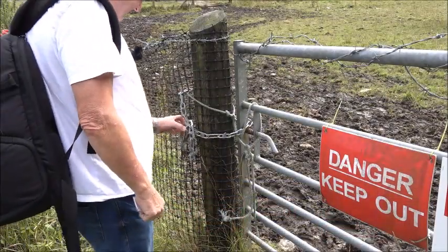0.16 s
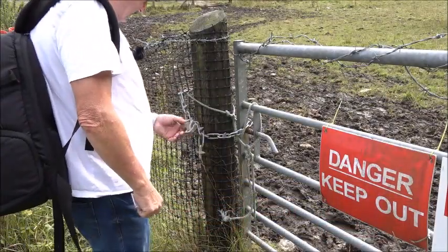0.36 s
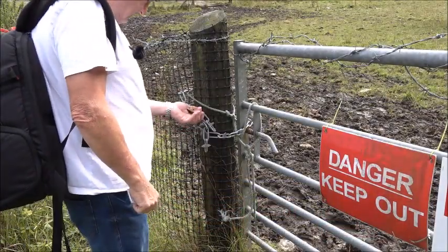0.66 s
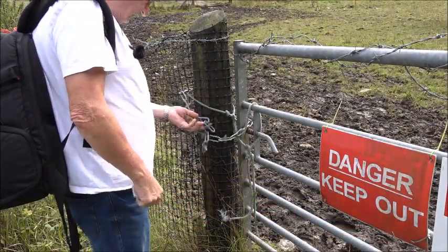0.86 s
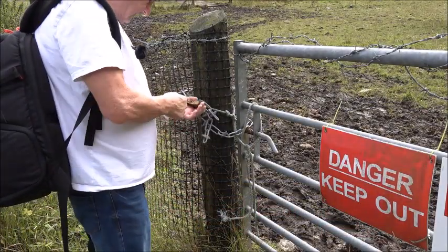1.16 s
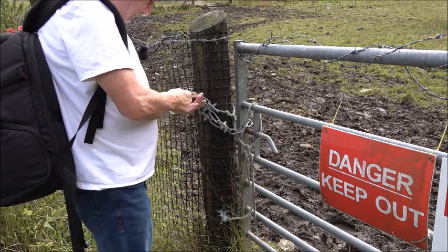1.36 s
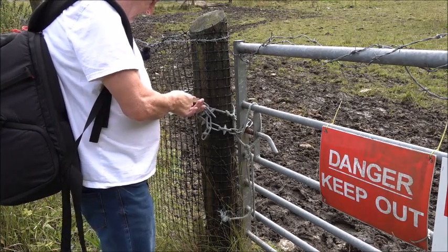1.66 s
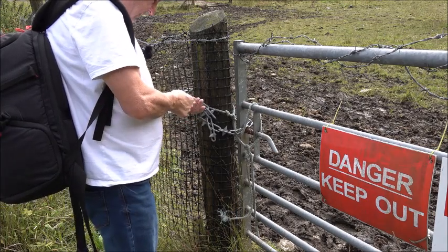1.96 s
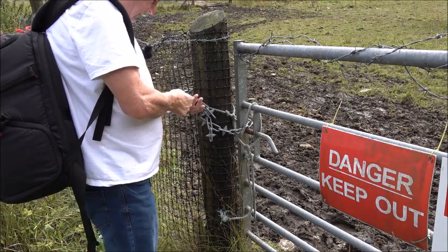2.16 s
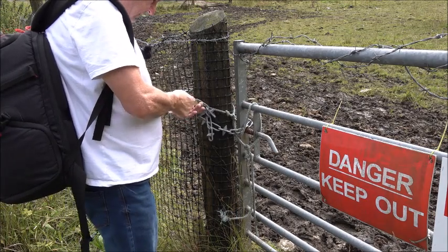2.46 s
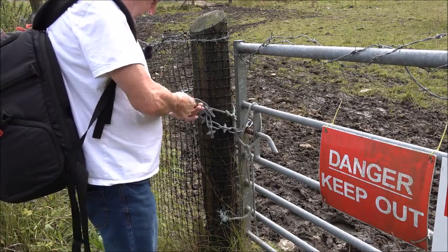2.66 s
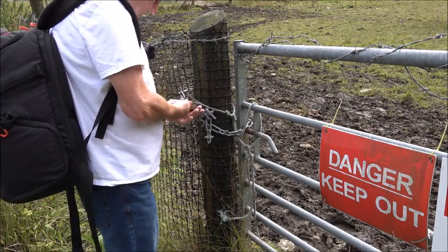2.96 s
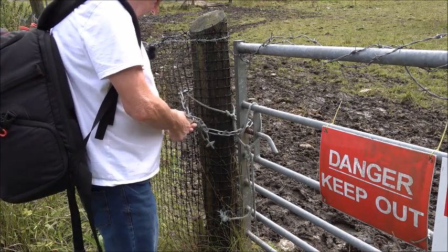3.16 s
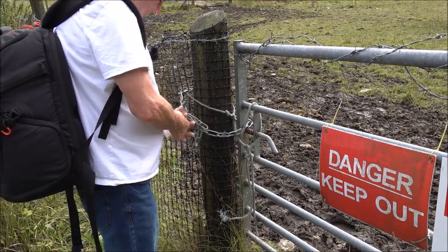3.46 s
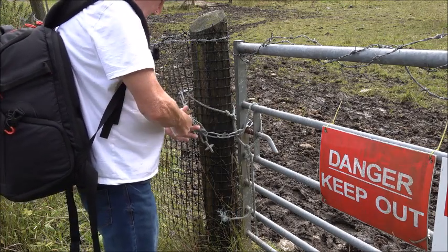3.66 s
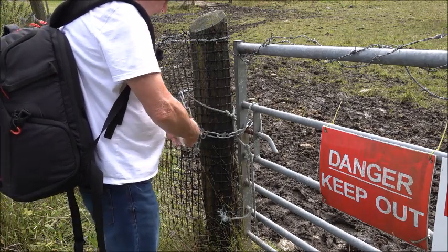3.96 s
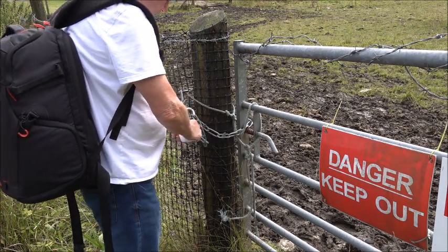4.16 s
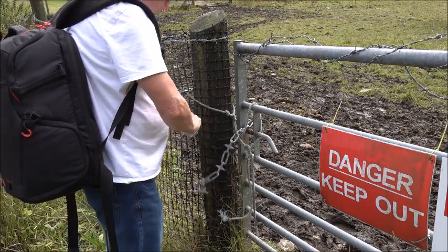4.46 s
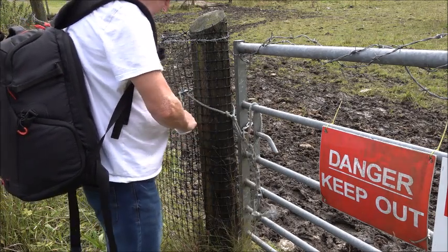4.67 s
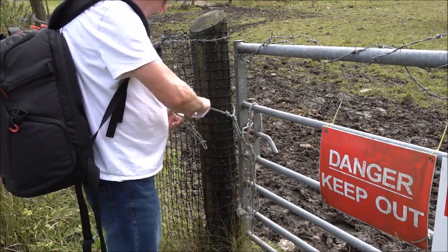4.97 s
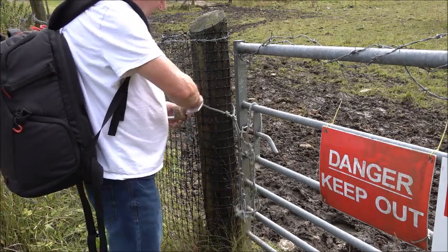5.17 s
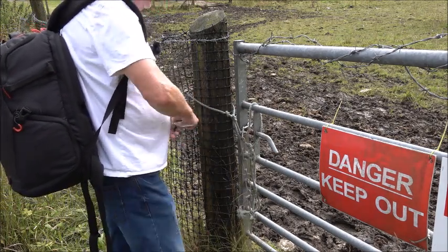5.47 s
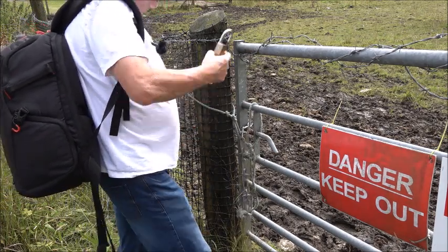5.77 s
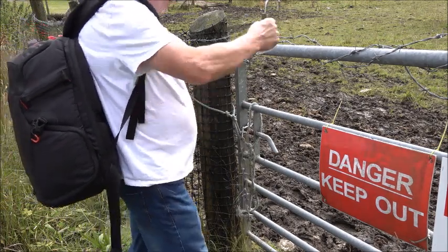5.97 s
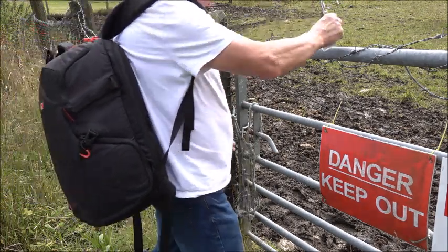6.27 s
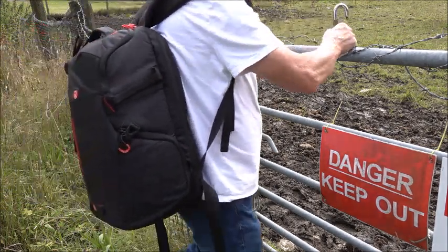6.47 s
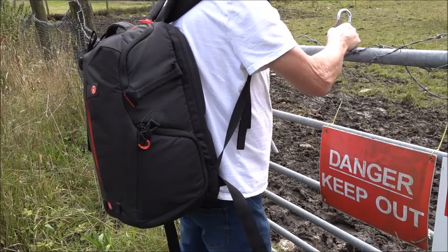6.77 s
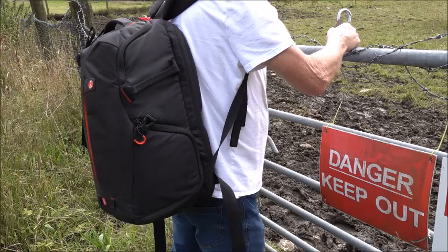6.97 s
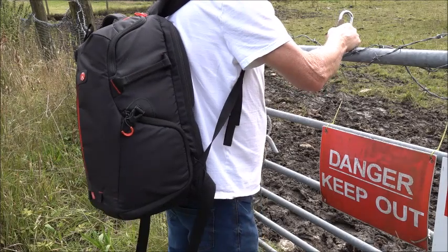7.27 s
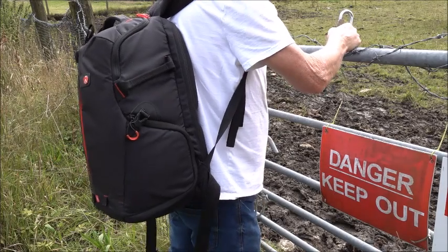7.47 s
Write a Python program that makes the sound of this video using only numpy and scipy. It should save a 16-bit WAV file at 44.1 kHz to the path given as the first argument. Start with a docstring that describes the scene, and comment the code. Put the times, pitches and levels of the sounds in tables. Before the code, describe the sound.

Outdoors, chain links jingle, a snap hook clicks, the freed chain strikes a hollow steel gate, and a shove makes it clatter.

```python
"""A steel chain is unhooked from a tubular field gate, outdoors. Its links clink as damped modes and slide as dense slips.
The snap hook clicks with short, hand-damped modes; the freed chain excites the long modes of the gate's tubes.
Shoving makes the gate rattle in short noise bursts; bumps on a wooden post thud and knock.
Clothes and scuffing are clumped noise, over steady open air and a faint low hum that swells twice."""
import sys
import numpy as np
from scipy import signal
from scipy.fft import rfft, irfft, next_fast_len
from scipy.io import wavfile

SR = 44100
rng = np.random.default_rng(int(sys.argv[2]) if len(sys.argv) > 2 else 0)


def digitize_waveform(pressure):
    """Quantize a signal to 16-bit integers and store it at the path in sys.argv[1].

    Rows of a 2-D input are taken as channels; values are limited to [-1, 1].
    """
    field = np.atleast_2d(pressure).T
    bounded = np.clip(field, -1, 1)
    quanta = np.round(bounded * 32767).astype(np.int16)
    wavfile.write(sys.argv[1], SR, quanta)


N = 336042
AGE = np.arange(int(.9 * SR)) / SR   # time since a contact, s

# All levels are relative: each source adds its own gain.
# strikes of link on link: [t/s, link size, ring level/dB, clash level/dB]
LINK_STRIKES = [(0.122, "long", -52.5, -50.5), (0.548, "long", -36, -36.5), (.5622, "long", -30, -32.5),
                (0.574, "long", -24, -26.5), (.632, "long", -45, -39.5), (0.6608, "short", -40.5, -34.5),
                (.7672, "short", -45.5, -44.5), (.8305, "long", -38, -48), (0.8687, "long", -36, -45),
                (.889, "long", -44, -28), (0.9342, "long", -31, -27), (0.9664, "long", -29.5, -26.5),
                (1.0472, "short", -47, -59), (1.128, "short", -44, -50), (1.213, "short", -50, -38.5),
                (1.2342, "short", -48, -39.5), (1.3107, "short", -57, -45.5), (1.3783, "short", -56, -39),
                (1.544, "long", -46.5, -51), (1.6415, "short", -38, -40), (2.9346, "long", -37, -27.5),
                (4.1594, "long", -39, -49), (4.1681, "long", -38.5, -35.5), (4.2411, "long", -49.5, -16),
                (4.2976, "long", -33.5, -27.5), (4.3724, "long", -43.5, -52), (4.4144, "short", -54, -33.5),
                (4.4548, "long", -38, -36), (4.4651, "long", -23.5, -24), (4.5059, "long", -25.5, -18.5),
                (4.5495, "long", -17, -20.5), (4.568, "short", -32, -27), (5.508, "long", -44, -46),
                (5.564, "long", -34.5, -33.5), (5.5839, "long", -27, -26), (5.619, "long", -30, -33.5),
                (5.6649, "long", -56, -42), (5.725, "long", -50, -45)]
# runs of links tumbling over each other: [start t/s, end t/s, level/dB]
TUMBLE_RUNS = [(.39, .52, -57), (.9, .93, -31), (4.245, 4.28, -46), (4.47, 4.485, -42),
               (4.52, 4.545, -32.5), (5.59, 5.615, -39)]
# how taut the hand holds the chain: [t/s, tautness from 0 hanging free to 1 taut]
TAUTNESS = [(0, 0.75), (1.7, 1), (4.15, 0.14), (4.5, 0.038), (4.56, .9), (5.6, 0.51)]
# modes of the two link sizes: size: [pitch f/Hz, overtone f/Hz, overtone level/dB, overtone t60 over pitch t60]
LINK_MODES = {"long": (6621.5, 12758.5, -3, 1.07), "short": (7230, 12870, 3.5, 1.6)}
# modes of the neighbouring links, shaken by a clash: [f/Hz, level/dB]
NEIGHBOUR_MODES = [(5030, -10.5), (5320, -19), (6040, -1.5), (7150, -9.5), (7500, -2), (8330, -8.5),
                   (8650, 2), (8880, -12.5), (9350, 1), (10720, -2), (11100, -24), (11370, 6),
                   (11930, -8.5), (13560, -1.5), (14560, -21.5)]
# spectrum of the clash of links: [f/Hz, level/dB]
CLASH_SPECTRUM = [(4500, -13.5), (6000, -5.5), (7000, 0), (9000, 4), (10200, -6.5), (11200, -5),
                  (13000, -10), (15500, -14.5)]
# spectrum of the knock on the chain: [f/Hz, level/dB]
KNOCK_SPECTRUM = [(150, -7), (1200, -6), (2200, 3.5), (4500, -2), (7000, -2.5), (12000, -26)]
FREE_T60_S, TAUT_T60_S = 0.19, 0.059   # a taut chain rings shorter
HARD_HIT_DB, SHORTER_PER_DB = -31.5, 0.0449   # and harder hits die sooner; t60 log-slope per dB of clash
KNOCK_DB, SLACK_LOSS_DB = 6, 16   # the knock against the clash when taut; what a free chain loses of it
HELD_NEIGHBOURS_DB = 7.5   # a taut chain mutes the neighbouring links by this much
OVERTONE_FOLLOWS = 0.37   # the overtone's level lies this share of the way from ring to clash

# snaps of the hook: [t/s, body level/dB, hardness as edge over body/dB]
HOOK_CLICKS = [(.198, -60.5, 17.5), (0.441, -46, 5), (.6479, -46, 12), (.7217, -47, 2), (0.8968, -45, 16),
               (1.008, -47, 11.5), (1.58, -41.5, -13), (1.8978, -37, 6), (2.2093, -45.5, 0.5),
               (2.378, -44.5, -10), (2.4464, -37, -2), (2.631, -42.5, 20.5), (2.9254, -24, 1.5),
               (3.1887, -43, 15.5), (3.2977, -43, 10), (3.41, -37.5, 1), (3.5123, -34.5, -4),
               (3.525, -26.5, -2), (3.533, -31.5, 7), (3.5599, -24.5, 3.5), (3.5995, -40.5, 10.5),
               (3.6057, -28.5, 4.5), (3.7345, -31, 2.5), (3.809, -41, -13), (3.8902, -37.5, 2),
               (3.915, -36, -3), (3.9367, -27.5, -4), (3.965, -22.5, -2), (3.9762, -27.5, 3),
               (3.9978, -38, -4), (4.033, -38, 1.5), (5.167, -44, 14), (5.4635, -46, 4),
               (5.7736, -40.5, -2), (5.8328, -35.5, 5), (5.8526, -27, 11.5), (5.8897, -35.5, 4),
               (6.3706, -31.5, 9), (6.388, -32, 2.5), (6.4112, -38, 0), (6.425, -46.5, 11)]
# fumbling with the hook, runs of lighter contacts: [start t/s, end t/s, body level/dB]
FUMBLE_RUNS = [(.67, .7, -50.5), (2.81, 2.9, -45), (3.13, 3.19, -45.5), (3.35, 3.405, -45),
               (3.55, 3.575, -34.5), (3.94, 3.962, -31.5), (5.13, 5.165, -45.5), (5.855, 5.88, -39)]
# low modes of the hook: [f/Hz, level/dB, t60/s]
HOOK_BODY_MODES = [(1273, -8.5, 0.02), (1890, 2, 0.02), (2016, -8, 0.067), (2140, -17, 0.016),
                   (2966, -10.5, 0.02)]
# high modes of the hook: [f/Hz, level/dB, t60/s]
HOOK_EDGE_MODES = [(3880, -2, 0.033), (4850, -12.5, 0.016), (5550, 16, 0.012), (6220, 0, 0.03),
                   (7840, -3.5, 0.07), (9900, -7, 0.05), (14450, -30, 0.018)]
# spectrum of a small steel tick: [f/Hz, level/dB]
TICK_SPECTRUM = [(300, -48), (900, -12), (2000, -2), (4000, -1.5), (6500, -0.5), (9500, -7), (12000, -15.5),
                 (15500, -18.5)]
FUMBLE_HARDNESS_DB = 7   # edge over body

# steel sliding over steel: [start t/s, end t/s, level/dB]
SLIDE_RUNS = [(0.582, 0.593, -30), (0.885, 0.981, -33), (0.985, 1.065, -48), (2.494, 2.592, -51.5),
              (2.6, 2.627, -47), (2.897, 2.949, -39), (3.34, 3.41, -45), (3.929, 3.983, -35.5),
              (4.513, 4.589, -35.5), (5.827, 5.863, -26.5)]
# spectrum of the sliding: [f/Hz, level/dB]
SLIDE_SPECTRUM = [(200, -15), (700, -19), (1300, -1), (2000, 2.5), (3000, 0), (7000, 0.5), (9000, 0.5),
                  (11500, -9.5), (15500, -5.5)]
TICKS_DB, TICKS_FOLLOW = -3.5, 0.94   # loose ticks at a rub level of 0 dB; share of its swing in dB
LET_GO_S, LET_GO_DB = 5.9, -5   # once the chain is let go, its links tick less

# the chain hits the gate: [t/s, body level/dB, crash level/dB, whine level/dB, whine centre f/Hz]
GATE_STRIKES = [(4.6794, -17, -17.5, -23, 4520), (4.739, -24.5, -23.5, -23, 4490),
                (4.7858, -31, -24.5, -55, 4470), (4.8274, -27.5, -18, -21, 4443),
                (4.957, -21.5, -17.5, -23, 4231)]
# low modes of the gate: [f/Hz, level/dB, t60/s]
GATE_BODY_MODES = [(225, -22, 0.43), (286, -21, 0.87), (524, -15.5, 0.97), (588, -7.5, 0.3),
                   (617.5, -8, 0.45), (736, -5.5, 0.26), (944, -4, 0.4), (1000, -1, 0.35), (1058, -6, 0.25),
                   (1228, -7, 0.19), (1400, 3, 0.21), (1462, 2, 0.24), (1513, -7, 0.43), (1960, -2, 0.15),
                   (2010, 6, 0.18), (2480, -13.5, 0.225), (2725, 2.5, .2), (2880, -22, 0.22),
                   (3370, 2.5, 0.13)]
# high modes of the gate: [f/Hz, level/dB]
GATE_TOP_MODES = [(4931, -11.5), (5190, -6.5), (5440, 2), (5760, -2.5), (6089, -1), (6449, -6),
                  (6849, -6.5), (7273, -13), (7613, -7), (7766, -30), (9243, -2), (12180, -6.5),
                  (12390, -16)]
# close-set modes of the tube wall, which beat: [f/Hz, level/dB, t60/s]
WALL_MODES = [(4153, -2, .68), (4204, -1, .55), (4249, -2, .55), (4290, -5, .6), (4344, 3, .72),
              (4398, -3, .66), (4485, -10, .42), (4606, -10, .48), (4651, -12, .5)]
# spectrum of the blow's thud: [f/Hz, level/dB]
THUD_SPECTRUM = [(60, -18), (200, -12.5), (400, -7.5), (600, 3), (800, -3.5), (1450, 3.5), (2200, 1),
                 (2900, 3), (3600, -12.5), (5000, -17.5)]
# spectrum of the blow's crash: [f/Hz, level/dB]
CRASH_SPECTRUM = [(3000, -26), (4300, -4), (5500, -5.5), (8000, -5), (9700, -10), (11000, -14.5),
                  (12400, -9), (15500, -25.5)]
# the shoved gate jolts in its fittings: [t/s, body level/dB, crash level/dB]
GATE_JOLTS = [(7.269, -28, -31), (7.2949, -24, -26.5), (7.3516, -20.5, -23), (7.4568, -34.5, -32.5),
              (7.5083, -38.5, -25)]
# spectrum of a jolt's body: [f/Hz, level/dB]
JOLT_BODY_SPECTRUM = [(100, -25), (350, -26), (580, -0.5), (800, -28), (1250, 0), (1650, -11), (2000, -5),
                      (2700, 4.5), (3400, -2), (6000, -8.5)]
# spectrum of a jolt's crash: [f/Hz, level/dB]
JOLT_CRASH_SPECTRUM = [(3000, 0), (4500, -5), (7000, 2.5), (9000, 0), (12000, -1.5), (15500, -19)]
# early echoes from the ground and the body: [delay t/s, level/dB]
EARLY_ECHOES = [(.0019, -20), (.0046, -21)]

# hand and chain bump the wooden post: [t/s, thump level/dB, hard knock level/dB]
POST_BUMPS = [(0.579, -46.5, -35), (.635, -48.5, -36), (2.628, -51.5, -38), (2.9357, -44, -13.5),
              (4.415, -52, -32.5), (4.55, -47, -23)]
# spectrum of the post's thump: [f/Hz, level/dB]
POST_THUMP_SPECTRUM = [(40, -8), (70, -4.5), (200, -11.5), (400, -8), (900, -12.5)]
# spectrum of steel knocking on wood: [f/Hz, level/dB]
POST_KNOCK_SPECTRUM = [(150, -12.5), (500, -5.5), (1000, 1.5), (1500, 3), (2200, -1), (3000, 1), (4500, -9),
                       (7000, -3), (12000, -23)]

# rubs, scuffs and a few brief ticks: [centre t/s, half width t/s, level/dB]
RUBS_AND_TICKS = [(.325, 0.0096, -50), (.66, 0.21, -53.5), (.97, 0.08, -45.5), (1.38, 0.24, -55.5),
                  (2.75, 0.23, -59.5), (3.3, .13, -54), (3.8, 0.5, -61.5), (4.35, 0.25, -56.5),
                  (4.555, 0.065, -44), (5.62, 0.09, -52), (6.08, 0.2, -57), (6.625, .046, -39.5),
                  (6.712, .011, -44.5), (6.775, 0.03, -47.5), (7.272, 0.014, -32), (7.35, 0.052, -29.5),
                  (7.53, 0.13, -40.5)]
# spectrum of the scuffing: [f/Hz, level/dB]
SCUFF_SPECTRUM = [(120, -14), (300, -9), (520, 1.5), (800, -2), (1300, -0.5), (1900, 3), (2800, -7),
                  (4500, -8), (7000, -20.5)]
# spectrum of the clothes: [f/Hz, level/dB]
CLOTH_SPECTRUM = [(2000, -7), (4000, -5), (7000, 7.5), (10000, -12), (13000, -9), (15500, -12.5)]
CLOTH_DB = -13.5   # hiss of the clothes against the scuffing
# swells of the faint hum: [centre t/s, half width t/s, level/dB]
HUM_SWELLS = [(1.25, 0.22, -59.5), (6.27, 0.094, -56)]
# spectrum of the hum: [f/Hz, level/dB]
HUM_SPECTRUM = [(330, -17), (410, 5), (490, -16)]
# spectrum of the open air: [f/Hz, level/dB]
AIR_SPECTRUM = [(20, 3.5), (60, 0.5), (150, -5), (300, -8.5), (550, -7), (1200, -10), (1950, -9.5),
                (3000, -17.5), (5000, -20), (8000, -23), (15000, -31.5)]


def links():
    """Modal excitation: a link rings at two pitches; its clash shakes the neighbours and knocks on the chain."""
    out = np.zeros(N)
    for s, size, ring_db, clash_db in LINK_STRIKES + tumbling():
        hz, overtone_hz, overtone_db, overtone_ring = LINK_MODES[size]
        taut = np.clip(np.interp(s, *np.transpose(TAUTNESS)), 0, 1)
        t60 = FREE_T60_S + taut * (TAUT_T60_S - FREE_T60_S)
        t60 *= np.exp(-SHORTER_PER_DB * (clash_db - HARD_HIT_DB))

        # each pitch is a close pair of modes
        pitch = [(hz, 0, t60), (hz + 55, -6, t60 * 1.3)]
        overtone = [(overtone_hz, 0, overtone_ring * t60), (overtone_hz + 80, -7, t60 * 0.73)]
        neighbours = [(line, db, min(1.06 * t60, .25)) for line, db in NEIGHBOUR_MODES]
        overtone_level_db = ring_db + overtone_db + OVERTONE_FOLLOWS * (clash_db - ring_db)
        neighbours_db = clash_db - 0.5 - HELD_NEIGHBOURS_DB * taut
        knock_db = clash_db + KNOCK_DB - SLACK_LOSS_DB * (1 - taut)

        add(out, s, from_db(ring_db + 4.5) * ring(pitch, vary_db=3.5, detune=0.0094))
        add(out, s, from_db(overtone_level_db) * ring(overtone, vary_db=9.0, detune=0.0025))
        add(out, s, from_db(neighbours_db) * ring(neighbours, vary_db=7.5, detune=0.0098))
        add(out, s, from_db(clash_db + 5.0) * burst(CLASH_SPECTRUM, t60=0.033, tail_db=-18.5, tail_t60=0.1))
        add(out, s, from_db(knock_db) * burst(KNOCK_SPECTRUM, t60=0.0057, tail_db=-8.5, tail_t60=0.054))
    return out


def tumbling(spread_db=2.0, clash_db=-2.0, short_share=.3):
    """Repeated impact: lighter strikes of either link as the chain runs through the hand."""
    strikes = []
    for s, db in run_of_contacts(TUMBLE_RUNS, spread_db):
        size = "short" if rng.random() < short_share else "long"
        strikes.append((s, size, db, db + clash_db))
    return strikes


def hook():
    """Heavy damping: the hook snaps and knocks on links, and the hand soon kills its variously tuned modes."""
    out = np.zeros(N)
    lighter = [(s, db, FUMBLE_HARDNESS_DB) for s, db in run_of_contacts(FUMBLE_RUNS, spread_db=2.0)]
    for s, body_db, hardness_db in HOOK_CLICKS + lighter:
        edge_db = body_db + hardness_db
        body = ring(HOOK_BODY_MODES, vary_db=3.5, detune=.04)
        edge = ring(HOOK_EDGE_MODES, vary_db=6.0, detune=.03)
        tick = burst(TICK_SPECTRUM, t60=0.0055, tail_db=-25.0, tail_t60=0.06)
        add(out, s, from_db(body_db + 7.0) * body)
        add(out, s, from_db(edge_db - 4.5) * edge)
        add(out, s, from_db(edge_db + 10.0) * tick)
    return out


def slides(slips_per_s=700, uneven_db=3.5, edge_s=0.0025):
    """Stick-slip friction: rough galvanised steel catches and slips in a dense run of tiny ticks."""
    out = np.zeros(N)
    for start, end, db in SLIDE_RUNS:
        size = max(int((end - start) * SR), 200)
        slips = rng.random(size) < slips_per_s / SR
        slips = slips * from_db(uneven_db * rng.standard_normal(size))
        # each slip opens a short envelope over a constant floor
        grit = signal.fftconvolve(slips, fade(0.0041)[:size])[:size] + 0.065
        friction = coloured(grit * rng.standard_normal(size), SLIDE_SPECTRUM)
        to_nearest_end = np.minimum(np.arange(size), np.arange(size)[::-1]) / SR
        add(out, start, from_db(db) * friction * np.minimum(to_nearest_end / edge_s, 1))
    return out


def loose_ticks(per_s=60, uneven_db=8.0):
    """Random impact: links settle against each other with tiny ticks at random moments."""
    touches = rng.random(N) < per_s / SR
    touches = touches * from_db(uneven_db * np.clip(rng.standard_normal(N), -2, 1.5))
    envelope = signal.oaconvolve(touches, fade(0.014)[:2000])[:N]
    return coloured(envelope * rng.standard_normal(N), TICK_SPECTRUM)


def stirred_links(rub_level):
    """Common envelope: the loose ticks grow with the rub level, and weaken once the chain is let go."""
    let_go = np.arange(N) / SR > LET_GO_S
    return from_db(TICKS_DB + LET_GO_DB * let_go) * rub_level ** TICKS_FOLLOW * loose_ticks()


def gate_blows(whine_width_hz=190, top_t60=0.15):
    """Position-dependent modal excitation: where the chain strikes the tubes decides which wall modes sing."""
    out = np.zeros(N)
    for s, body_db, crash_db, whine_db, centre_hz in GATE_STRIKES:
        wall = []
        for hz, db, t60 in WALL_MODES:
            off_centre = (hz - centre_hz) / whine_width_hz * 2
            wall.append((hz, db - 10 * np.log10(1 + off_centre ** 4), t60))
        top = [(hz, db, top_t60) for hz, db in GATE_TOP_MODES]
        add(out, s, from_db(whine_db) * ring(wall, vary_db=5.5))
        add(out, s, from_db(body_db - 1.0) * ring(GATE_BODY_MODES, vary_db=0.0))
        add(out, s, from_db(body_db - 1.0) * burst(THUD_SPECTRUM, t60=0.18, tail_db=-16, tail_t60=0.3))
        add(out, s, from_db(crash_db) * ring(top, vary_db=3.5))
        add(out, s, from_db(crash_db + 1.5) * burst(CRASH_SPECTRUM, t60=0.1, tail_db=-16, tail_t60=0.28))
    return out


def gate_jolts():
    """Damping by contact: with a hand on its top rail the gate clatters without ringing."""
    out = np.zeros(N)
    for s, body_db, crash_db in GATE_JOLTS:
        body = burst(JOLT_BODY_SPECTRUM, t60=0.12, tail_db=-18, tail_t60=0.18)
        crash = burst(JOLT_CRASH_SPECTRUM, t60=0.04, tail_db=-8.0, tail_t60=0.15)
        add(out, s, from_db(body_db + 6.5) * body)
        add(out, s, from_db(crash_db + 0.5) * crash)
    return out


def nearby(x, dull_hz=5000):
    """Early reflection: ground and body throw back dull echoes that thicken each attack."""
    out = x.copy()
    lowpass = signal.butter(1, dull_hz, fs=SR, output="sos")
    dull = signal.sosfilt(lowpass, x + 1e-18)
    for delay, db in EARLY_ECHOES:
        add(out, delay, from_db(db) * dull)
    return out


def post():
    """Impact on a lossy solid: a bump on wood gives a dull thump, and steel on it a short knock."""
    out = np.zeros(N)
    for s, thump_db, knock_db in POST_BUMPS:
        thump = burst(POST_THUMP_SPECTRUM, t60=0.12, tail_db=-4, tail_t60=0.24)
        knock = burst(POST_KNOCK_SPECTRUM, t60=0.013, tail_db=-16, tail_t60=0.042)
        add(out, s, from_db(thump_db) * thump)
        add(out, s, from_db(knock_db) * knock)
    return out


def scuffing(rub_level):
    """Friction noise: clumped noise swells in rubs, scuffs and a few brief ticks."""
    spectrum = uneven(SCUFF_SPECTRUM, spread_db=2.5)
    return rub_level * rustle(spectrum, grain_db=3.5, grains_per_s=300)


def clothes(rub_level):
    """Friction noise of fabric: a finer-grained, brighter hiss follows the same rub level."""
    return rub_level * from_db(CLOTH_DB) * rustle(CLOTH_SPECTRUM, grain_db=5.0, grains_per_s=520)


def open_air():
    """Stationary broadband noise: the outdoor background stays level throughout."""
    return from_db(-56.0) * noise(AIR_SPECTRUM)


def hum():
    """Narrow-band noise: a faint low hum swells twice."""
    return swells(HUM_SWELLS) * noise(HUM_SPECTRUM)


def from_db(db):
    """Logarithmic level: decibels to amplitude gain."""
    return 10 ** (np.asarray(db) / 20)


def add(track, s, sound):
    """Superposition: mix a sound in at time s."""
    start = int(s * SR)
    part = sound[:N - start]
    track[start:start + len(part)] += part


def coloured(x, spectrum):
    """Spectral filtering: give x a spectrum that falls away beyond its ends; rms 1."""
    hz, db = np.transpose(spectrum)
    size = next_fast_len(len(x))
    log_f = np.log(np.maximum(np.fft.rfftfreq(size, 1 / SR), 1))
    below = np.maximum(np.log(hz[0]) - log_f, 0)
    above = np.maximum(log_f - np.log(hz[-1]), 0)
    gain = from_db(np.interp(log_f, np.log(hz), db)) * np.exp(-2 * (below + above))
    y = irfft(rfft(x, size) * gain, size)[:len(x)]
    return y / np.sqrt(np.mean(y ** 2) + 1e-20)


def noise(spectrum, size=N):
    """Filtered white noise, rms 1."""
    return coloured(rng.standard_normal(size), spectrum)


def uneven(spectrum, spread_db, count=40):
    """Contact variation: the same spectrum with chance peaks and dips, as a new contact point gives."""
    hz, db = np.transpose(spectrum)
    grid = np.geomspace(hz[0], hz[-1], count)
    level_db = np.interp(np.log(grid), np.log(hz), db)
    return np.c_[grid, level_db + spread_db * rng.standard_normal(count)]


def fade(t60, age=AGE, contact_s=0.00032):
    """Exponential damping: a build-up with time constant contact_s, and a fall of 60 dB in t60."""
    decay = np.exp(-np.log(1000) * age / max(t60, 1e-4))
    return decay * (1 - np.exp(-age / contact_s))


def burst(spectrum, t60, tail_db, tail_t60):
    """High modal density: countless close modes as noise with a fast fall, then a weaker, longer tail."""
    age = AGE[:int(1.3 * max(t60, tail_t60) * SR)]
    white = rng.standard_normal(len(age))
    envelope = fade(t60, age) + from_db(tail_db) * fade(tail_t60, age)
    return coloured(white, uneven(spectrum, spread_db=3.5)) * envelope


def ring(modes, vary_db, detune=0.0):
    """Modal superposition: damped sines of chance strength and sign, scaled to rms 1 before their envelopes."""
    out, power = np.zeros(len(AGE)), 0
    chances = rng.standard_normal((len(modes), 3))
    for (hz, db, t60), (strength, shift, turn) in zip(modes, chances):
        age = AGE[:int(1.5 * t60 * SR)]
        gain = from_db(db + vary_db * strength)
        sine = np.sin(2 * np.pi * hz * (1 + detune * shift) * age)
        out[:len(age)] += np.sign(turn) * gain * sine * fade(t60, age)
        power += gain ** 2 / 2
    return out / np.sqrt(power + 1e-20)


def run_of_contacts(runs, spread_db, count=3):
    """Irregular repetition: each run breaks into contacts uneven in time and strength; rows [t/s, level/dB]."""
    contacts = []
    for start, end, db in runs:
        for k in range(count):
            s = start + (end - start) * (k + rng.random()) / count
            contacts.append((s, db + spread_db * rng.standard_normal()))
    return contacts


def rustle(spectrum, grain_db, grains_per_s):
    """Amplitude modulation: rubbing noise comes in small uneven clumps."""
    grain_position = np.arange(N) * grains_per_s / SR
    clumps = np.interp(grain_position, np.arange(N), rng.standard_normal(N))
    return coloured(rng.standard_normal(N) * from_db(grain_db * clumps), spectrum)


def swells(rows):
    """Addition of powers: bell-shaped swells from rows [centre t/s, half width t/s, level/dB]."""
    t = np.arange(0, N, 64) / SR
    power = sum(from_db(db) ** 2 * np.exp(-((t - s) / width) ** 2) for s, width, db in rows)
    return np.interp(np.arange(N) / SR, t, np.sqrt(power))


def scene():
    """Superposition of sources: steel with its echoes, post, scuffing and clothes, before open air and hum."""
    rub_level = swells(RUBS_AND_TICKS)
    chain = links() + hook() + slides() + stirred_links(rub_level)
    gate = gate_blows() + gate_jolts()
    steel = nearby(chain + gate)
    rubbing = scuffing(rub_level) + clothes(rub_level)
    background = open_air() + hum()
    return (steel + post() + rubbing + background)[None]


def record(dry):
    """Saturation and band limiting: tanh rounds the highest peaks, then a steep low-pass cuts the top."""
    rounded = np.tanh(dry)
    lowpass = signal.ellip(10, .1, 80, 15900, fs=SR, output="sos")   # order, ripple dB, stopband dB, edge Hz
    return signal.sosfilt(lowpass, rounded)


dry = scene()
out = record(dry)
digitize_waveform(out)
```